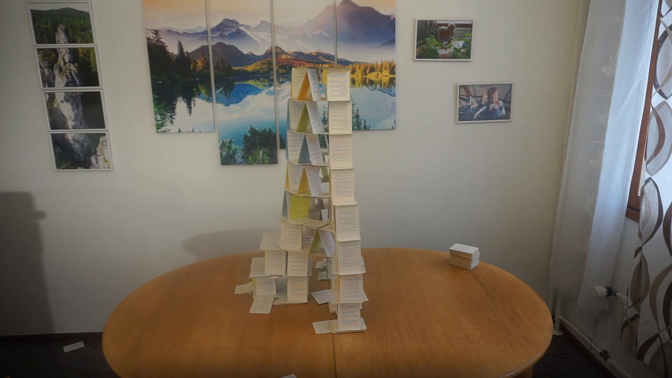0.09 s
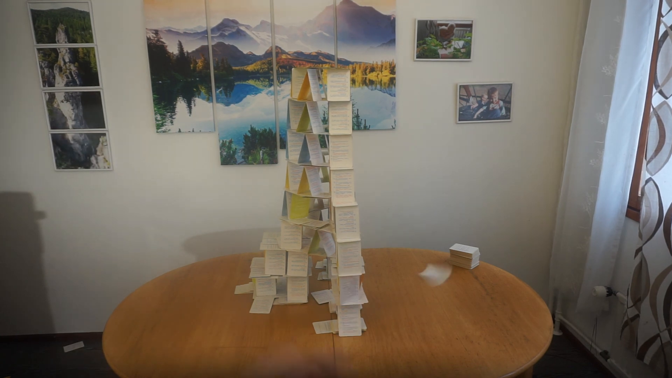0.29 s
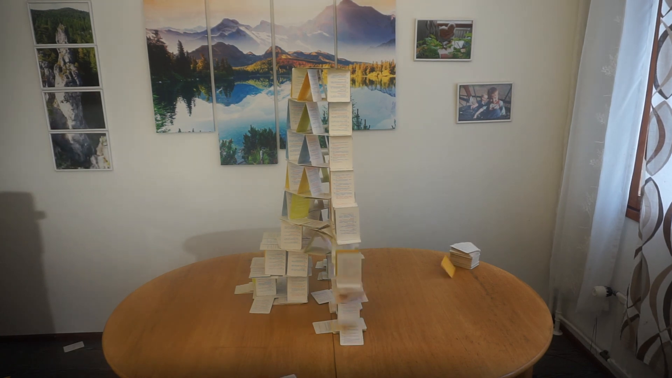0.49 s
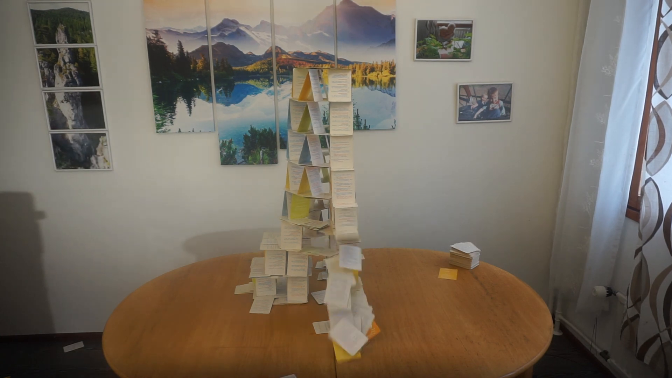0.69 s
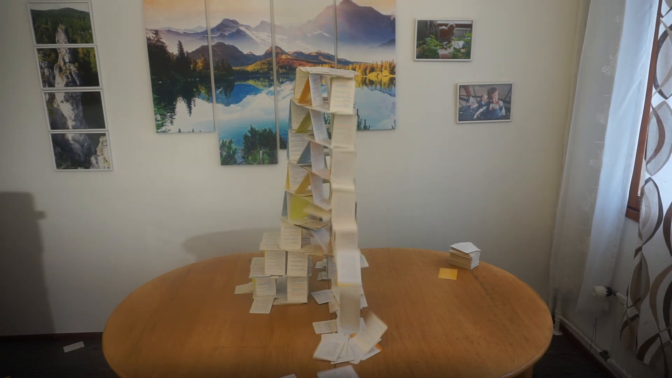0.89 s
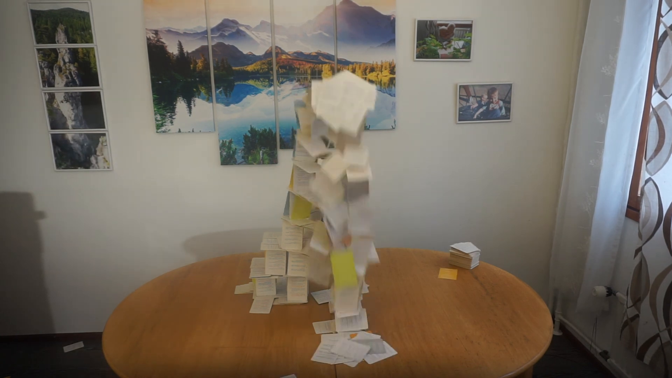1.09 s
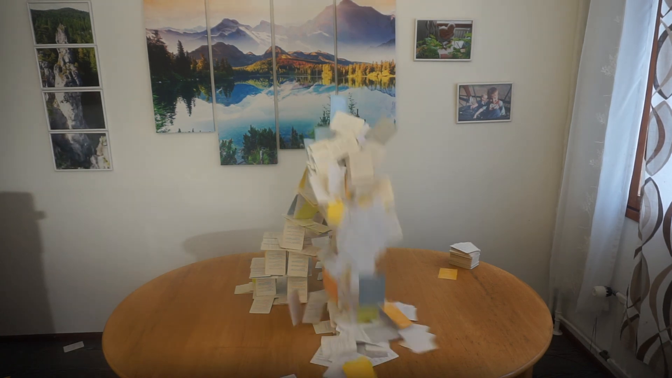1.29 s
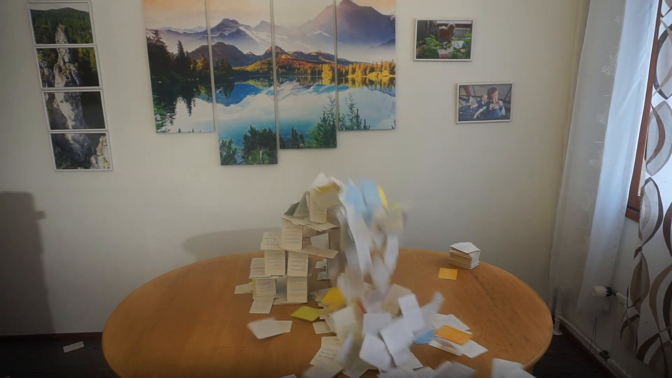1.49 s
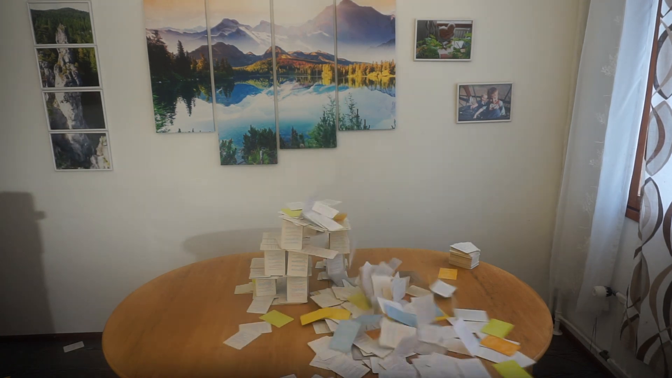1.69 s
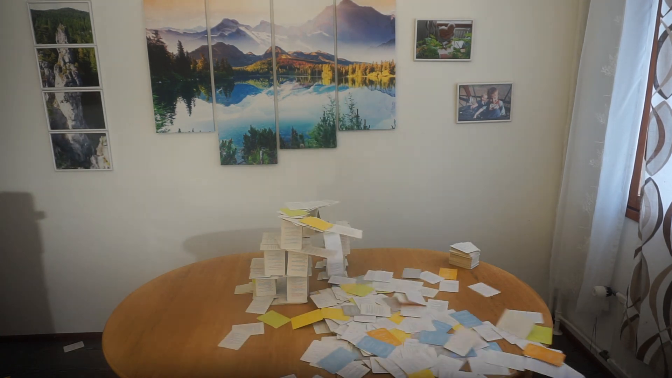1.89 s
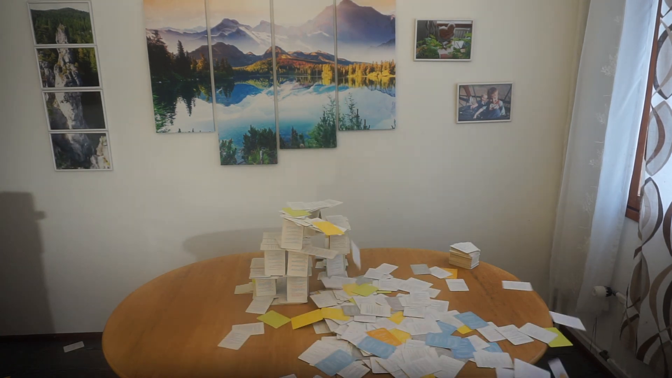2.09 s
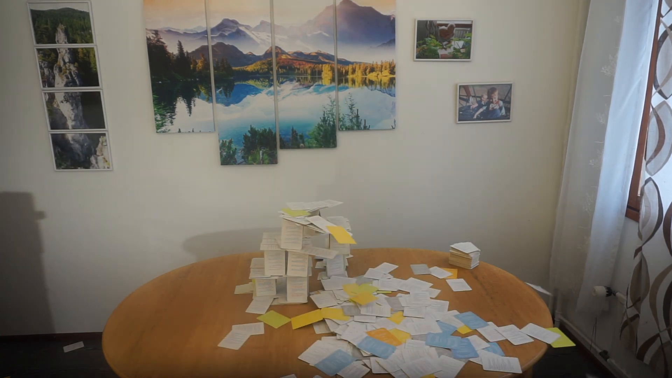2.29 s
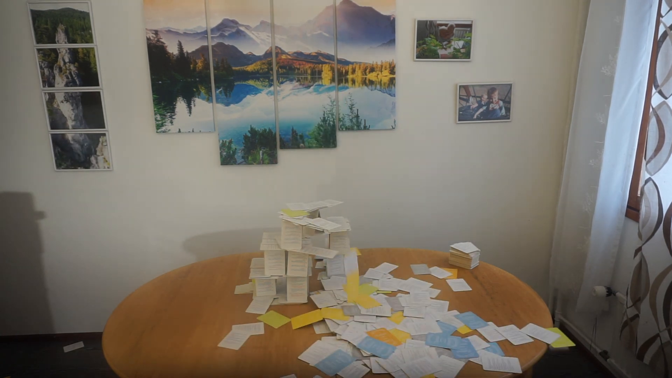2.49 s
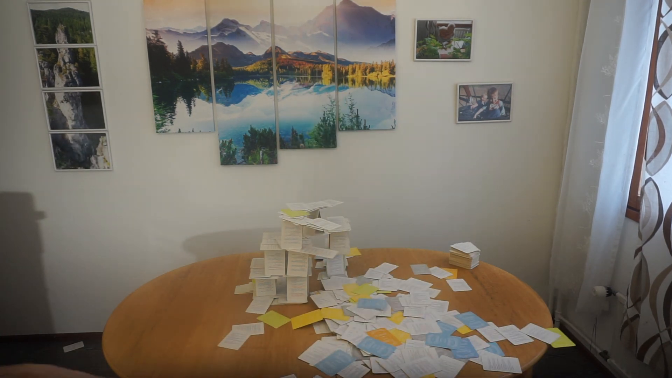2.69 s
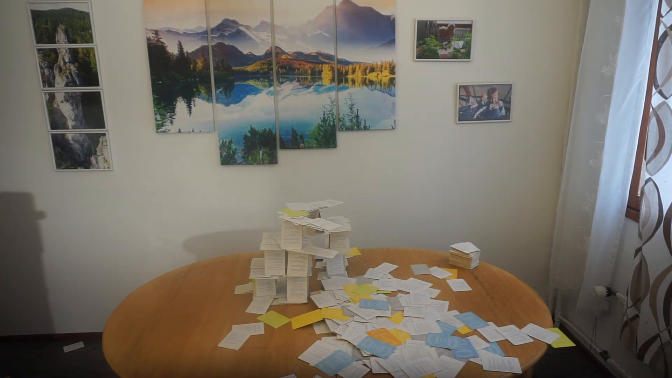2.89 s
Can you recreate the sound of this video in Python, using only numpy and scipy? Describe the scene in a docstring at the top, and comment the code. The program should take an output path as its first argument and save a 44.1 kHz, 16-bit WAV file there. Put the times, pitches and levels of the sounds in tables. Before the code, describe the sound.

A tall card house collapses, slapping and pouring in a dense papery rush over a wooden table

```python
"""Collapse of a house of cards

A tall house of cards collapses on a wooden table in a bare, lively room. Storeys give way in slaps,
short runs of filtered impacts; the tower pours down as dense ticks and sliding noise over table modes.
Stragglers follow, the last with hollow claps, each a broad air resonance with a papery crack.
Edge snaps, bright skims, two low puffs, a faint tone and the hush of the room complete the scene."""
import sys
import numpy as np
from scipy import signal
from scipy.fft import rfft, irfft, next_fast_len
from scipy.io import wavfile
from scipy.ndimage import map_coordinates

SR = 44100
rng = np.random.default_rng(int(sys.argv[2]) if len(sys.argv) > 2 else 0)


def waveform_to_disk(signal):
    """Save audio, clipped to [-1, 1], as 16-bit WAV at the path in sys.argv[1]."""
    frames = np.transpose(np.atleast_2d(signal))
    scaled = np.clip(frames, -1, 1) * 32767
    samples = np.round(scaled).astype(np.int16)
    wavfile.write(sys.argv[1], SR, samples)


N = 134505  # samples

# Spectrum of the still room: frequency_hz, level_db
HUSH_SPECTRUM = [(25, -32), (70, -7), (140, -12), (250, -7), (500, -18), (1000, -11), (1700, -18),
                 (4000, -24), (11000, -25)]
HUSH_DB = -58
FAINT_TONE_S, FAINT_TONE_HZ, FAINT_TONE_PEAK_DB, FAINT_TONE_WIDTH_S = 0.088, 824, -55, 0.034

# Bunches of cards striking and skidding:
# start_s, level_db, length_s, body_db, treble_db, tone_hz, pan_db (left over right)
SLAPS = [(.153, -42, 0.0087, 7.5, 4, 6460, 5.5), (0.2386, -21.5, 0.01, -7.5, 0.5, 2220, 2),
         (0.256, -22, 0.026, 0, 3, 2220, 3), (0.28, -21, 0.018, 3.5, -1, 2120, -1),
         (0.31, -25, 0.025, 1.5, 5.5, 7600, 1.5), (0.349, -22, 0.026, 4.5, -5, 2170, 0.5),
         (0.449, -34.5, 0.0058, 4.5, -3, 2220, -1), (0.53, -31.5, 0.017, 4.5, 4, 2300, 1),
         (.623, -35, 0.0057, -0.5, 3, 2720, 1), (0.642, -37.5, 0.022, 3, -7, 2720, -1),
         (.677, -20.5, 0.017, -5.5, -3.5, 2980, -1.5), (0.713, -19, 0.034, 2, 4.5, 3430, 1.5),
         (0.951, -20, 0.0093, 0.5, 0.5, 2660, -1), (0.977, -22.5, 0.0095, -6, 8, 2650, 1),
         (1.045, -28.5, 0.014, -5, -1, 2800, 2), (1.116, -20.5, 0.023, 3.5, 1.5, 6000, -1),
         (1.187, -18.5, .025, -2.5, 4, 3260, 1.5), (1.307, -20.5, 0.017, 7.5, 2.5, 730, 1.5),
         (1.399, -21, 0.01, 0, 5, 2580, 1.5), (1.565, -21, 0.076, -19, 6, 3630, -1),
         (1.842, -29.5, 0.046, -19, 4, 1300, 2), (1.681, -23.5, 0.037, 5.5, -4, 2430, 2),
         (1.928, -23.5, 0.013, 6, 3.5, 2860, 1), (1.958, -27, .01, -15, 0.5, 2600, 1),
         (1.988, -22, 0.024, -0.5, 2.5, 6440, 0), (2.078, -23.5, 0.025, -1.5, -13, 1730, 0),
         (2.106, -18.5, 0.037, -3.5, 8, 1760, 0), (2.206, -29, 0.035, 4, -1, 1590, 1),
         (2.306, -27.5, 0.023, -19, 5, 2820, 1), (2.338, -22, 0.03, -2, 3.5, 1470, -1),
         (2.376, -17.5, 0.028, 0.5, 0, 2700, 0), (2.417, -22, 0.041, 3, 9.5, 2740, 0.5),
         (2.476, -24.5, 0.031, 9, -5.5, 1580, -1), (2.541, -27, 0.0044, -5, 3.5, 3960, 0.5),
         (2.583, -29, 0.0072, -13.5, 3.5, 4250, 0.5), (2.743, -30, 0.0073, 10, -1.5, 4000, 1)]
# Spectrum of cards striking: frequency_hz, level_db
CARD_SPECTRUM = [(40, -49), (130, -19), (250, -11), (600, -6.5), (1200, 0), (2400, 0.5), (3400, -3),
                 (5500, -5.5), (9000, -7), (11000, -7.5)]
BODY_HZ, TREBLE_HZ = 1030, 3240  # where a slap's body ends and its treble begins
CONTACTS_PER_S, CONTACT_SPREAD_DB, SKID_DB = 500, 3.5, -8
RELEASE_S, FIRST_TOUCH = 0.0044, 0.41  # first touch relative to the norm of the run
TONE_DB, TONE_OCTAVES = 4.5, 0.25  # broad resonance of a bunch of cards

# Soft low puffs before the fall: centre_s, level_db
PUFFS = [(0.184, -48.5), (.228, -52)]
PUFF_WIDTH_S, PUFF_HZ = 0.021, 110

# The pouring tower, levels before mixing: time_s, rustle_db, knock_db
POUR = [(.2, -56, -36.5), (.3, -46, -63), (.5, -41.5, -43.5), (.7, -22, -47), (.87, -24, -33),
        (1.001, -21.5, -34.5), (1.09, -19, -37.5), (1.16, -15.5, -30), (1.26, -14, -33), (1.37, -14, -27),
        (1.44, -13.5, -69), (1.54, -13.5, -33), (1.66, -12, -38), (1.731, -16.5, -37), (1.79, -25, -47),
        (1.9, -27, -39.5), (2.03, -23.5, -41), (2.25, -26.5, -42.5), (2.55, -29, -42.5), (2.63, -36, -72),
        (2.748, -68, -76)]
# Resonances of cards of different bend in the heap: tone_hz
POUR_TONES = [790, 1160, 1720, 2770]
# Spectrum of the rustle: frequency_hz, level_db
RUSTLE_SPECTRUM = [(40, -43), (150, -18), (400, -5.5), (900, -3.5), (1500, -2), (2600, -2), (3600, -3),
                   (5500, -6.5), (9000, -5.5), (11000, -10.5), (14000, -56)]
# Modes of the table top: frequency_hz, width_hz, level_db
TABLE_MODES = [(141, 25, -12), (211.6, 21, 2), (231, 20, 3.5), (280, 21, -2.5), (339, 18, 3), (412, 27, 3),
               (530, 34, -20), (695, 20, -1.5)]
TICKS_PER_S, TICK_SPREAD_DB, POUR_SKID_DB = 210, 4.5, -6.5  # for each card tone
KNOCKS_PER_S, KNOCK_SPREAD_DB = 150, 6.5
CLUMP_DB, CLUMPS_PER_S = 5.5, 70  # cards arrive in uneven clumps

# Card edges snapping on the wood: start_s, level_db
SNAPS = [(0.2393, -51), (.685, -25.5), (1.8213, -26.5), (1.8257, -27.5)]
# Spectrum of an edge snap: frequency_hz, level_db
EDGE_SPECTRUM = [(200, -17.5), (1200, -0.5), (2600, -5), (3900, 3.5), (6000, -1), (11000, -5)]
SNAP_DIRECT_DB = -6.5

# Cards landing flat on a cushion of air:
# start_s, level_db, pitch_hz, length_s, crack_db (relative to the hollow part)
CLAPS = [(1.454, -27, 1170, .015, -25), (1.496, -23, 1030, 0.02, -6), (1.563, -26.5, 990, 0.021, -15),
         (1.684, -30, 950, .025, -21), (2.042, -28.5, 520, 0.014, -14), (2.148, -26.5, 760, 0.0043, -3),
         (2.334, -18.5, 508, 0.011, -3.5), (2.385, -27, 530, 0.011, -7), (2.509, -23.5, 886, 0.022, -23),
         (2.545, -31.5, 780, 0.024, 1), (2.667, -33, 700, 0.0065, -1), (2.744, -26.5, 600, 0.0063, -20),
         (2.764, -36.5, 604, 0.0086, -17), (2.898, -31.5, 680, 0.037, 1.5), (2.979, -44.5, 676, .02, 11)]
# Spectrum of the papery crack: frequency_hz, level_db
CRACK_SPECTRUM = [(60, -38), (250, -18.5), (600, 3), (1200, 2), (3000, -4.5), (5000, -11.5), (11000, -21.5)]
CLAP_Q, CLAP_EDGE_HZ = 2.8, 414  # sharpness and low edge of the hollow resonance

# Single cards skimming over the heap: start_s, level_db, length_s
SKIMS = [(2.556, -32, .04), (2.65, -26.5, 0.024)]
# Spectrum of a skim: frequency_hz, level_db
SKIM_SPECTRUM = [(300, -28), (1500, -9), (2700, -3), (3700, -0.5), (4800, -1.5), (6000, -16.5),
                 (11000, -18.5)]

# Reverberation time of the room: frequency_hz, decay_s (to -60 dB)
ROOM_T60 = [(150, 0.47), (530, 0.51), (1400, 0.52), (3700, 0.47), (10000, 0.32)]
# Stereo width of the room: frequency_hz, side_over_mid_db
ROOM_WIDTH = [(100, -18), (250, -20.5), (500, -11), (1000, -8.5), (2000, -4), (4000, -2.5), (9000, 2)]
DIRECT_DB, EARLY_DB, EARLY_S = -7.5, -1, 0.008

# Balance of the microphones: frequency_hz, left_over_right_db
BALANCE = [(250, 0), (2000, -1), (4500, 0.5), (8000, 4.5), (11000, 3.5)]
TOP_HZ, CEILING_DB = 11150, -5


def amp(db):
    """Logarithmic scale: decibels to amplitude gain."""
    return 10 ** (np.asarray(db) / 20)


def unit(x):
    """Normalisation: x at rms 1."""
    return x / np.sqrt(np.mean(x ** 2) + 1e-20)


def along(points, hz):
    """Interpolation: the second column of points read along a logarithmic frequency axis."""
    f, v = np.transpose(points)
    return np.interp(np.log(hz + 1), np.log(f + 1), v)


def filtered(x, response):
    """Linear filtering: the spectrum of x times a response of frequency."""
    n = x.shape[-1]
    size = next_fast_len(n + 8192, True)
    spectrum = rfft(x, size) * response(np.fft.rfftfreq(size, 1 / SR))
    return irfft(spectrum, size)[..., :n]


def coloured(x, level_db, size=2048):
    """Minimum phase: x through a causal filter whose folded cepstrum gives the level at each frequency."""
    cepstrum = irfft(np.log(amp(level_db(np.fft.rfftfreq(size, 1 / SR))) + 1e-6))
    cepstrum[1:size // 2] *= 2
    cepstrum[size // 2 + 1:] = 0
    impulse_response = irfft(np.exp(rfft(cepstrum)))
    return signal.fftconvolve(x, impulse_response)[:len(x)]


def contacts(n, per_s, spread_db):
    """Random impact process: irregular tiny impacts of varied size and sign, rms 1."""
    struck = rng.random(n) < per_s / SR
    size = amp(spread_db * rng.uniform(-2, 1.85, n))
    return unit(struck * size * rng.choice([-1, 1], n))


def flurry(length):
    """Impact and friction: a first touch, then contacts and skidding that die quickly after length."""
    t = np.arange(SR // 2) / SR
    x = contacts(len(t), CONTACTS_PER_S, CONTACT_SPREAD_DB)
    x = x + amp(SKID_DB) * rng.standard_normal(len(t))
    x = x * np.exp(-np.maximum(t - length, 0) / RELEASE_S)
    x[0] += FIRST_TOUCH * np.linalg.norm(x)
    return x


def tone(f, hz):
    """Broad resonance: a Gaussian bump in decibels around hz on an octave scale."""
    return TONE_DB * np.exp(-.5 * (np.log2((f + 1) / hz) / TONE_OCTAVES) ** 2)


def wobble(per_s):
    """Random modulation: a smooth curve through per_s random values a second."""
    return map_coordinates(rng.standard_normal(1000), [np.arange(N) * per_s / SR], mode="mirror")


def room(x, direct_db):
    """Reverberation: stereo sound of x from one spot by direct path, dense early reflections and a tail."""
    hz, t, z = signal.stft(rng.standard_normal((2, SR // 2)), SR, nperseg=256)
    side_share = 1 / (1 + amp(-2 * along(ROOM_WIDTH, hz)))  # of the energy
    z = z * np.sqrt([1 - side_share, side_share])[..., None]
    z = z * amp(-60 * t / along(ROOM_T60, hz)[:, None])
    mid, side = signal.istft(z, SR, nperseg=256)[1]
    t = np.arange(len(mid)) / SR
    early = 1 + amp(EARLY_DB) * np.exp(-t / EARLY_S)
    onset = 1 - np.exp(-t / 0.0009)
    paths = np.array([mid + side, mid - side]) * early * onset
    paths /= np.sqrt(np.sum(paths ** 2) / 2)
    paths[:, 0] += amp(direct_db)
    return signal.fftconvolve(x[None], paths, axes=1)[:, :len(x)]


def add(out, s, db, y, pan_db=0):
    """Superposition: place stereo y at s; db is its energy as an rms over a twentieth of a second."""
    y = filtered(y, lambda f: 1 / (1 + (f / TOP_HZ) ** 20))
    y = y * amp(db) * np.sqrt(SR / 10 / np.sum(y ** 2))
    y = y * amp([[pan_db / 2], [-pan_db / 2]])
    i = round(s * SR)
    out[:, i:i + y.shape[1]] += y[:, :N - i]


def hush():
    """Stationary noise: shaped noise partly shared by both channels is the hush of the room."""
    noise = filtered(rng.standard_normal((3, N)), lambda f: amp(along(HUSH_SPECTRUM, f)))
    return amp(HUSH_DB) * unit(noise[0] + .5 * noise[1:])


def faint_tone():
    """Pure tone: a sine under a Gaussian swell is heard briefly."""
    t = np.arange(N) / SR
    swell = np.exp(-((t - FAINT_TONE_S) / FAINT_TONE_WIDTH_S) ** 2)
    return amp(FAINT_TONE_PEAK_DB) * swell * np.sin(2 * np.pi * FAINT_TONE_HZ * t)


def slaps():
    """Multiple impact: each bunch lands on two spots, with more body if broad, more treble if glancing."""
    out = np.zeros((2, N))
    for s, db, length, body_db, treble_db, hz, pan_db in SLAPS:
        def colour(f):
            body = body_db / (1 + (f / BODY_HZ) ** 4)
            treble = treble_db * (1 - 1 / (1 + (f / TREBLE_HZ) ** 6))
            return along(CARD_SPECTRUM, f) + tone(f, hz) + body + treble
        spots = [room(coloured(flurry(length), colour), DIRECT_DB) for spot in range(2)]
        add(out, s, db, sum(spots), pan_db)
    return out


def puffs():
    """Low-passed noise: Gaussian swells of low noise make two soft puffs."""
    t = np.arange(N) / SR
    low = unit(filtered(rng.standard_normal(N), lambda f: 1 / (1 + (f / PUFF_HZ) ** 2)))
    return low * sum(amp(db) * np.exp(-((t - s) / PUFF_WIDTH_S) ** 2) for s, db in PUFFS)


def table(f):
    """Modal resonance: the table top answers as a sum of damped modes of alternating sign."""
    response = 0
    for k, (centre, width, db) in enumerate(TABLE_MODES):
        damping = 1j * f * width
        response = response + (-1) ** k * amp(db) * damping / (centre * centre - f * f + damping)
    return response


def pour():
    """Impact and modal excitation: cards tick and slide in uneven clumps and drum on the table top."""
    s, rustle_db, knock_db = np.transpose(POUR)
    t = np.arange(N) / SR
    rustle_level = amp(np.interp(t, s, rustle_db, left=-np.inf))
    knock_level = amp(np.interp(t, s, knock_db, left=-np.inf))
    out = np.zeros((2, N))
    for hz in POUR_TONES:
        ticks = contacts(N, TICKS_PER_S, TICK_SPREAD_DB) + amp(POUR_SKID_DB) * rng.standard_normal(N)
        clumps = amp(CLUMP_DB * np.minimum(wobble(CLUMPS_PER_S), 2))
        rustle = unit(coloured(ticks * clumps, lambda f: along(RUSTLE_SPECTRUM, f) + tone(f, hz)))
        out += room(rustle * rustle_level, DIRECT_DB) / len(POUR_TONES)
    knocks = unit(filtered(contacts(N, KNOCKS_PER_S, KNOCK_SPREAD_DB), table))
    return out + room(knocks * knock_level, DIRECT_DB) / 2


def snaps():
    """Impulse response: a card edge on the wood is one impulse through the edge spectrum."""
    out = np.zeros((2, N))
    for s, db in SNAPS:
        snap = coloured(signal.unit_impulse(SR // 2), lambda f: along(EDGE_SPECTRUM, f))
        add(out, s, db, room(snap, SNAP_DIRECT_DB))
    return out


def claps():
    """Air resonance: air squeezed from under a flat card rings broad and hollow, with a papery crack."""
    out = np.zeros((2, N))
    for s, db, hz, length, crack_db in CLAPS:
        def hollow(f):
            resonance = 1 + (CLAP_Q * ((f + 1) / hz - hz / (f + 1))) ** 2
            low_edge = 1 + np.minimum(CLAP_EDGE_HZ / (f + 1), 1.7) ** 10
            high_fall = 1 + (f / (2 * hz)) ** 2
            return -10 * np.log10(resonance * low_edge * high_fall)

        def card():
            ring = unit(coloured(flurry(length), hollow))
            crack = unit(coloured(flurry(length), lambda f: along(CRACK_SPECTRUM, f)))
            return ring + amp(crack_db) * crack
        add(out, s, db, sum(room(card(), DIRECT_DB) for spot in range(3)))
    return out


def skims():
    """Sliding friction: a stray card slides to rest with a short bright swish."""
    out = np.zeros((2, N))
    for s, db, length in SKIMS:
        spots = [room(coloured(flurry(length), lambda f: along(SKIM_SPECTRUM, f)), DIRECT_DB)
                 for spot in range(2)]
        add(out, s, db, sum(spots))
    return out


def scene():
    """Superposition: all the falling cards over the quiet room."""
    return hush() + faint_tone() + slaps() + puffs() + pour() + snaps() + claps() + skims()


def record(dry):
    """Saturation and band limit: left microphone brighter, tallest peaks rounded, top cut off."""
    x = filtered(dry, lambda f: amp(along(BALANCE, f) * np.array([[.5], [-.5]])))
    x = x / (1 + (x / amp(CEILING_DB)) ** 4) ** (1 / 4)
    return filtered(x, lambda f: f < TOP_HZ)


dry = scene()
out = record(dry)
waveform_to_disk(out)
```